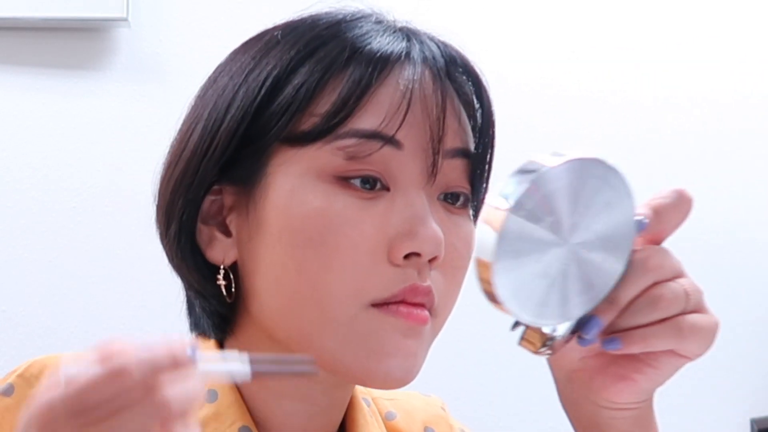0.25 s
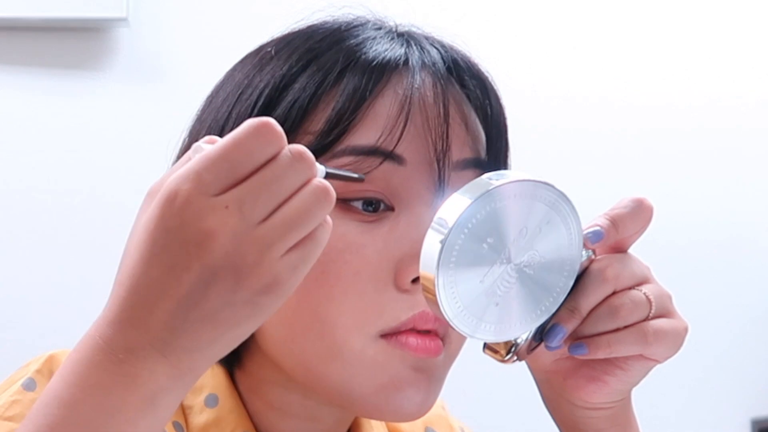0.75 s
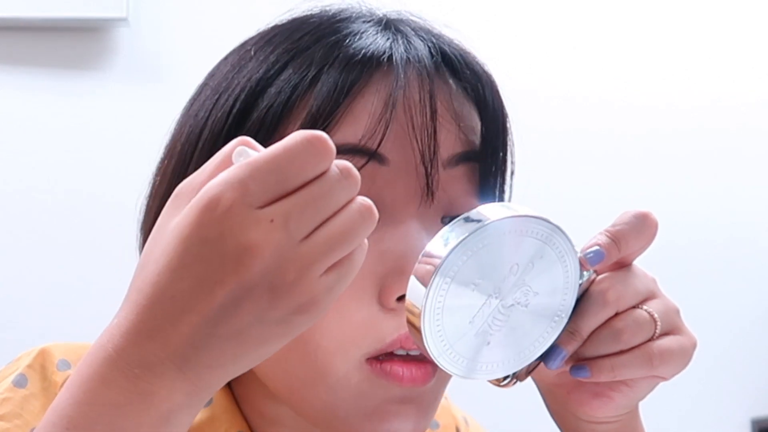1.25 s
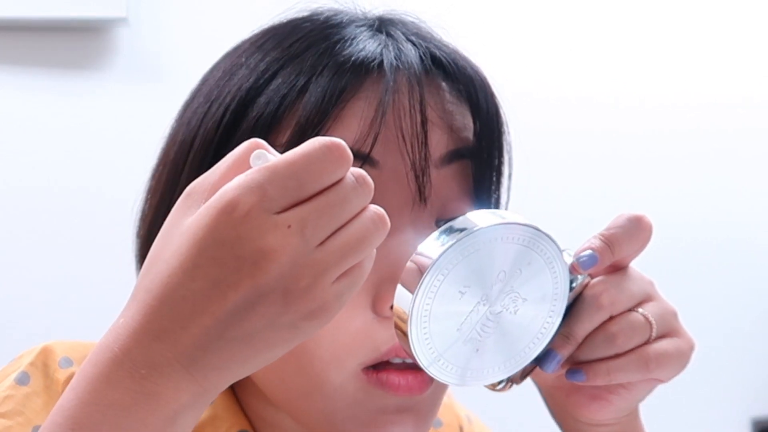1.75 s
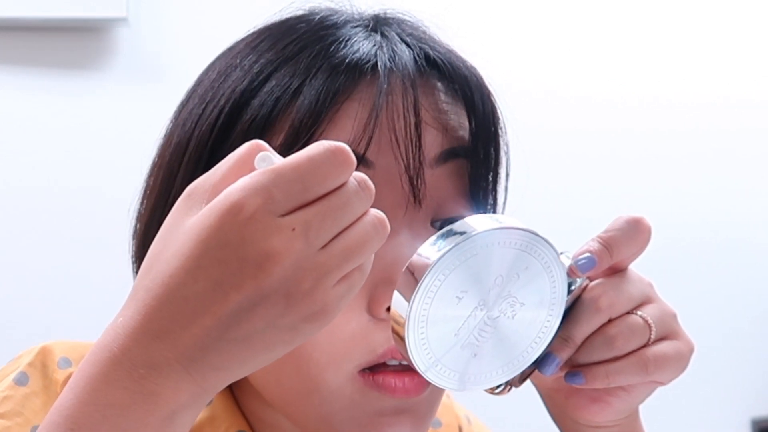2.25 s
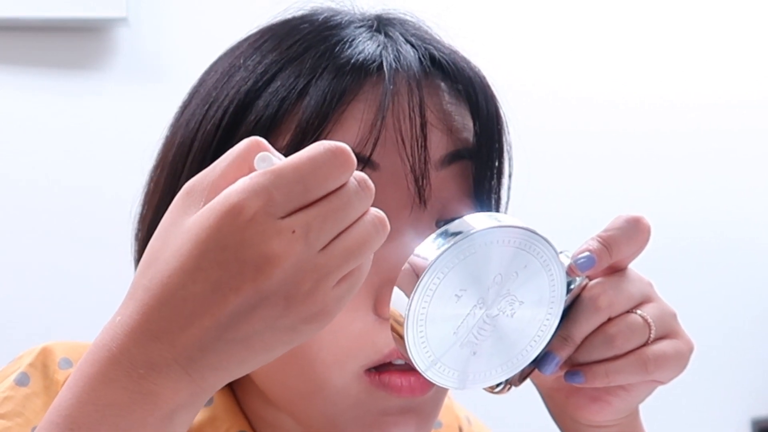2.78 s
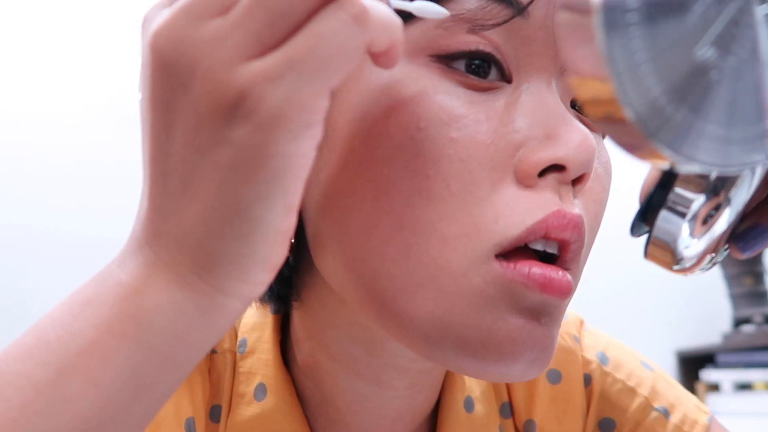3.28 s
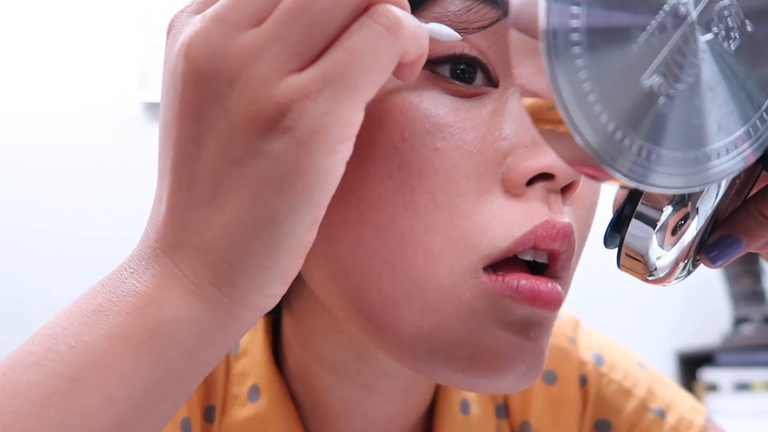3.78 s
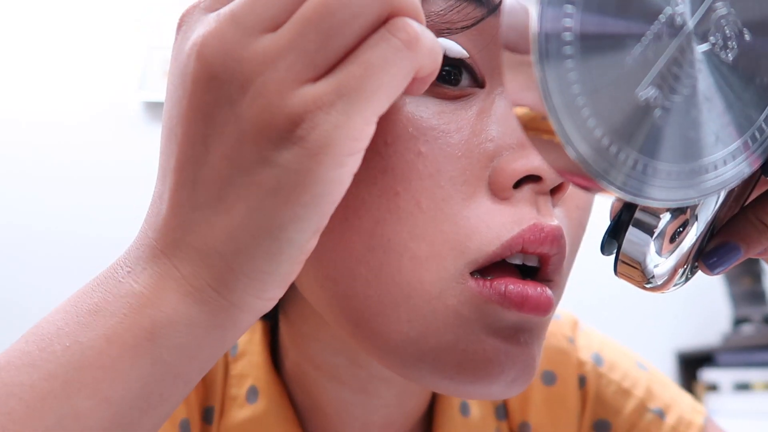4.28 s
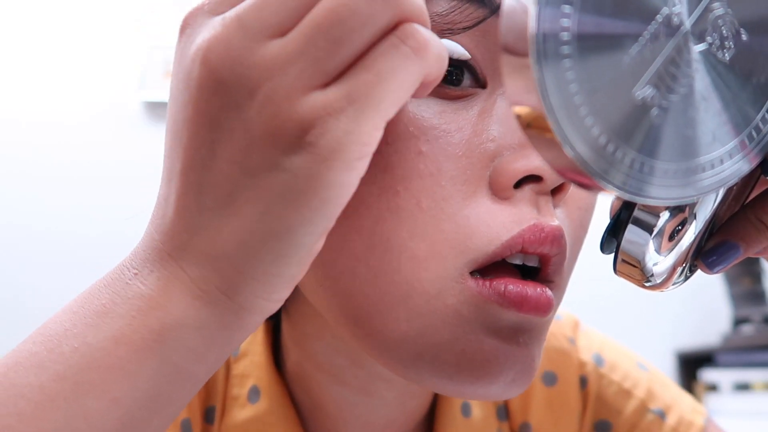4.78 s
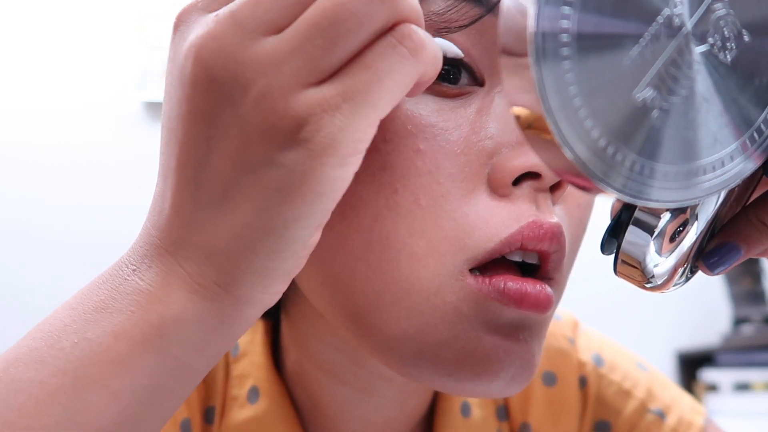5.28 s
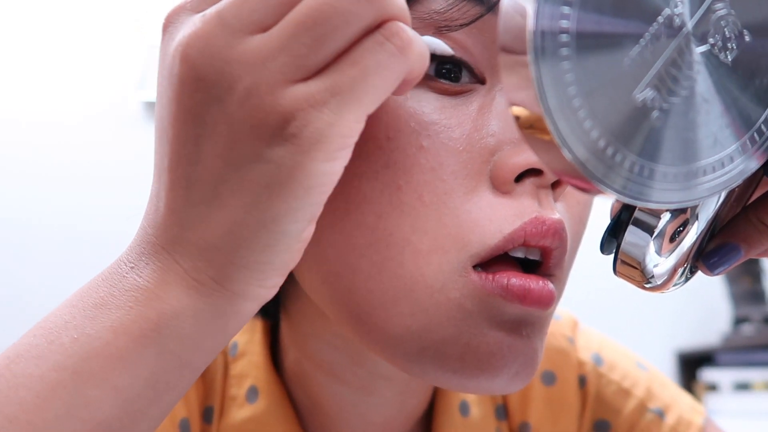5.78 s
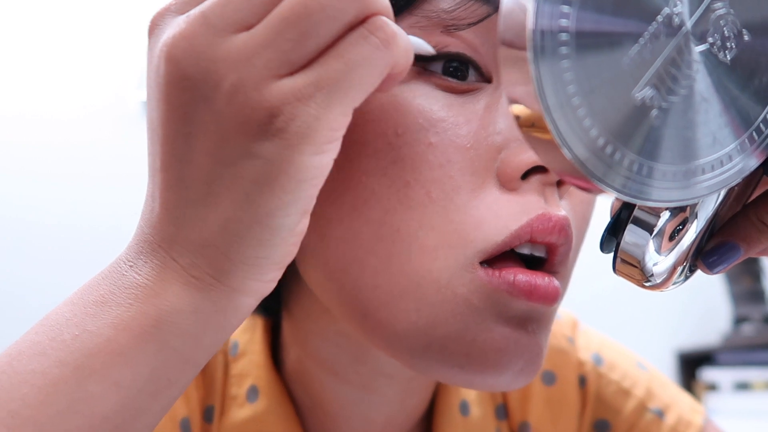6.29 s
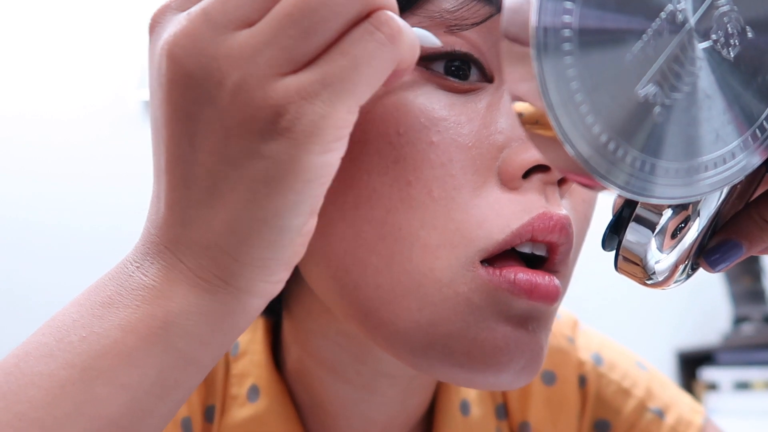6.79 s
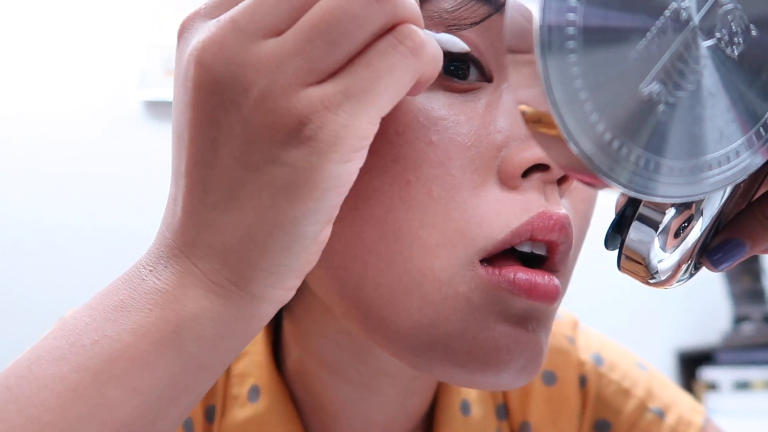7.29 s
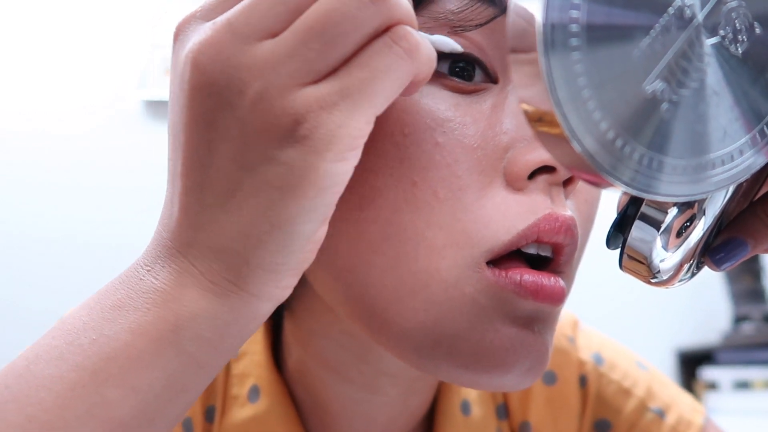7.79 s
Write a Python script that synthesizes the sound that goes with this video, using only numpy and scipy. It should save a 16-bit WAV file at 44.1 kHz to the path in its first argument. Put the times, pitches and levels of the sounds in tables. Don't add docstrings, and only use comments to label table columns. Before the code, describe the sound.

Close stereo microphone in a small, quiet, slightly live room. An air unit hums low and steadily with soft rushing. A short scrape of a small metal object opens the scene, then near-silence with tiny ticks. Just before three seconds the object is knocked down with sharp clacks and dull desk thumps. Afterwards the hum continues with faint motor ticking.

```python
import sys
import numpy as np
from scipy import signal
from scipy.fft import rfft, irfft, next_fast_len
from scipy.io import wavfile
from scipy.ndimage import uniform_filter1d, map_coordinates

SR = 44100
rng = np.random.default_rng(int(sys.argv[2]) if len(sys.argv) > 2 else 0)


def pcm_store(signal):
    levels = np.round(np.clip(np.atleast_2d(signal), -1, 1) * 32767)
    wavfile.write(sys.argv[1], SR, levels.astype(np.int16).T)


def convert_level_to_amplitude(level_db):
    exponent = np.asarray(level_db, float) / 20
    return 10 ** exponent


N = 354986
T = np.arange(N) / SR
MOVE_S = 3.25


def unit(x):
    return x / np.sqrt(np.mean(x ** 2) + 1e-20)


def along(points, hz):
    point_hz, value = np.transpose(points)
    return np.interp(np.log(hz + 1), np.log(point_hz + 1), value)


def filtered(x, response):
    size = next_fast_len(x.shape[-1] + SR // 4)
    spectrum = rfft(x, size) * response(np.fft.rfftfreq(size, 1 / SR))
    return irfft(spectrum, size)[..., :x.shape[-1]]


def resonances(modes):
    def response(f):
        total = 0
        for k, (hz, width_hz, db) in enumerate(modes):
            damping = 1j * f * width_hz
            total = total + (-1) ** k * convert_level_to_amplitude(db) * damping / (hz * hz - f * f + damping)
        return total
    return response


def noise(spectrum, patchy_db):
    z = signal.stft(rng.standard_normal(N), nperseg=512)[2]
    patches = uniform_filter1d(rng.standard_normal(z.shape), 8, 0)
    patches = uniform_filter1d(patches, 8, 1)
    x = signal.istft(z * convert_level_to_amplitude(patchy_db * unit(patches)), nperseg=512)[1][:N]
    return unit(filtered(x, lambda hz: convert_level_to_amplitude(along(spectrum, hz))))


def flutter(rate_hz):
    knots = rng.standard_normal(int(N * rate_hz / SR) + 4)
    return map_coordinates(knots, [T * rate_hz])


def placed(first, second):
    share = np.clip((T - MOVE_S) / 0.01, 0, 1)
    return np.sqrt(1 - share) * first + np.sqrt(share) * second


def add(track, start_s, sound):
    start = round(start_s * SR)
    part = track[..., start:start + sound.shape[-1]]
    part += sound[..., :part.shape[-1]]


# frequency in Hz, t60 in s.
ROOM_T60 = [(200, 0.11), (600, 0.49), (1400, 0.32), (4000, 0.21), (10000, 0.082)]
# frequency in Hz, level in dB.
PORT_DIFFERENCE = [(100, -48), (200, -42), (300, -18), (1000, -27), (3000, -14), (10000, 11)]


def echo(x):
    hz, t, z = signal.stft(rng.standard_normal((2, SR // 2)), SR, nperseg=256)
    decay = convert_level_to_amplitude(-60 * t / along(ROOM_T60, hz)[:, None])
    tail = signal.istft(z * decay, SR, nperseg=256)[1]
    tail /= np.linalg.norm(tail[0])
    delayed = np.pad(x, (200, 0))
    common, side = signal.fftconvolve(delayed[None], tail, axes=1)
    return np.array([common, filtered(side, lambda f: convert_level_to_amplitude(along(PORT_DIFFERENCE, f)))])


# frequency in Hz, level in dB at the first place, at the second.
MAINS_TONES = [(120, -41, -44), (240, -53, -59)]
# centre in seconds, change in dB.
SWELLS_DB = [(.17, -6.5), (.35, 1.5), (1.78, -17), (1.96, 2), (2.8, 5), (3.72, -8), (4.33, -14), (4.56, 5),
             (4.66, -8.5), (5.42, -6), (6.75, 3.5), (6.95, -11), (7.08, -8), (7.61, 4), (7.8, -14)]
# centre in s, spread in s, deep rise in dB, boom rise in dB.
STAND_SHUDDERS = [
    (0.01, 0.1, 9.5, 2.5),
    (2.74, 0.1, 6.5, 7),
]
# frequency in Hz, density in dB per Hz.
DEEP_SPECTRUM = [(6, -37), (16, -16), (33, 1.5), (49, -16), (63, -4), (82, -10.5), (100, -9), (128, -7),
                 (150, -43), (250, -120)]
# frequency in Hz, density in dB per Hz.
BOOM_SPECTRA = [
    [(60, -90), (110, -36), (135, 1), (145, -6.5), (172, 2), (180, -5.5), (190, 1.5), (215, -6.5),
     (240, -3), (252, -7.5), (275, -18), (310, -46), (500, -120)],
    [(60, -90), (110, -49), (135, -10.5), (145, 4), (172, -4.5), (180, 6), (190, -2), (215, -5.5),
     (240, -7), (255, -25.5), (275, -14.5), (310, -62), (500, -120)],
]
# frequency in Hz, density in dB per Hz.
RUSH_SPECTRA = [
    [(230, -40), (290, -4), (370, -7), (620, -2.5), (720, -7.5), (1050, -9), (1270, -15.5), (1550, -11),
     (2400, -18), (3000, -21.5), (4500, -29), (11000, -41.5), (14300, -47), (14700, -120)],
    [(230, -47), (290, -4.5), (450, 0), (520, -1), (580, -6.5), (630, -3.5), (1100, -12), (1600, -10.5),
     (2300, -16.5), (3000, -22), (4500, -27), (11000, -41), (12600, -43), (13000, -58), (13150, -120)],
]
# frequency in Hz, density in dB per Hz.
APART_SPECTRUM = [(40, -46), (95, -55), (130, -50), (170, -26), (215, -18), (300, -16), (460, -16),
                  (520, -20.5), (1000, -23), (3500, -30), (6000, -36), (11000, -44), (14300, -45),
                  (15000, -120)]
APART_END_HZ = [14400, 13150]


def air_unit():
    swell_s = 0.063
    swing_db = sum(db * np.exp(-((T - s) / swell_s) ** 2) for s, db in SWELLS_DB)
    deep_shake_db, boom_shake_db = 0, 0
    for s, spread_s, deep_db, boom_db in STAND_SHUDDERS:
        shake = np.exp(-((T - s) / spread_s) ** 2)
        deep_shake_db = deep_shake_db + deep_db * shake
        boom_shake_db = boom_shake_db + boom_db * shake

    tones = 0
    for hz, first_db, second_db in MAINS_TONES:
        phase = 2 * np.pi * hz * T + 0.083 * flutter(1.9)
        tones = tones + np.sqrt(2) * placed(convert_level_to_amplitude(first_db), convert_level_to_amplitude(second_db)) * np.sin(phase)
    mode = resonances([(115.63, 17.3, 0)])
    drone = convert_level_to_amplitude(-38.3) * unit(filtered(rng.standard_normal(N), lambda f: mode(f) ** 2))

    deep = placed(convert_level_to_amplitude(-37.5), convert_level_to_amplitude(-37.5)) * noise(DEEP_SPECTRUM, patchy_db=-0.4)
    deep *= convert_level_to_amplitude(0.05 * swing_db + deep_shake_db)
    first_boom, second_boom = [noise(spectrum, patchy_db=0.57) for spectrum in BOOM_SPECTRA]
    boom = placed(convert_level_to_amplitude(-40.5) * first_boom, convert_level_to_amplitude(-41.5) * second_boom)
    boom *= convert_level_to_amplitude(0.094 * swing_db + boom_shake_db)
    first_rush, second_rush = [noise(spectrum, patchy_db=1.1) for spectrum in RUSH_SPECTRA]
    rush = placed(convert_level_to_amplitude(-49) * first_rush, convert_level_to_amplitude(-49) * second_rush)

    apart = convert_level_to_amplitude(-58) * noise(APART_SPECTRUM, patchy_db=-1.5)
    apart = placed(*[filtered(apart, lambda f: f < end_hz) for end_hz in APART_END_HZ])
    return np.array([convert_level_to_amplitude(swing_db) * (tones + drone) + deep + boom + rush, apart])


FRAME_HZ = 29.97
# offset in s, level in dB idling, hunting, tracking.
MOTOR_PROGRAM = [(0, -70, -64, -55), (.008, -63, -59, -64), (.048, -61, -56, -53), (.067, -70, -61, -70),
                 (.076, -60, -57, -57), (.115, -61, -56, -57), (.133, -70, -57, -62), (.163, -70, -59, -70),
                 (.182, -66, -56, -60), (.201, -70, -64, -60), (.208, -70, -57, -60), (.248, -56, -57, -61)]
# from in seconds, to in seconds.
FOCUS_SPANS = [
    (.74, 2.2),
    (3.53, 4.45),
    (4.45, 8.05),
]


def motor_steps():
    offset_s, *state_db = np.transpose(MOTOR_PROGRAM)
    round_starts_s = np.arange(0.2281, N / SR, 8 / FRAME_HZ)
    times_s = round_starts_s[:, None] + offset_s
    scatter_db = 2 * rng.standard_normal(times_s.shape)
    steps = []
    for (begin_s, end_s), level_db in zip(FOCUS_SPANS, state_db):
        for s, db in zip(times_s.ravel(), (level_db + scatter_db).ravel()):
            if begin_s <= s < end_s:
                steps.append((s, db))
    return steps


# frequency in Hz, difference level in dB, common level in dB.
BARREL_MODES = [(3300, -9, -30), (3550, -20, -9), (4030, 0, -8), (4620, -11, -11), (5330, -14, -13)]
# frequency in Hz, dB at the first place, dB at the second, pulse depth 0-1.
DRIVE_WHINE = [(5526, -85, -92, 0.05), (11779, -94, -94, .3), (13006, -96, -81, .8)]


def lens():
    out, t = np.zeros((2, N)), np.arange(SR // 50) / SR
    shape = convert_level_to_amplitude(-60 * t / 0.014) * (1 - np.exp(-t / 0.0008)) ** 2
    for s, db in motor_steps():
        ring = 0
        for hz, side_db, common_db in BARREL_MODES:
            gain = convert_level_to_amplitude(np.array([[common_db], [side_db]]) + rng.normal(0, 1.5))
            ring = ring + gain * np.sin(2 * np.pi * hz * t + [[1.9], [0]])
        add(out, s - 0.001, convert_level_to_amplitude(db + 9) * ring * shape)
    for hz, first_db, second_db, depth in DRIVE_WHINE:
        pulse = 1 + depth * np.tanh(3 * np.sin(2 * np.pi * FRAME_HZ * T + 0.3))
        tone = placed(convert_level_to_amplitude(first_db), convert_level_to_amplitude(second_db)) * pulse * np.sin(2 * np.pi * hz * T)
        out += convert_level_to_amplitude([[-22], [0]]) * tone
    return out


# start in s, peak in dB,
# centre in Hz, width in Hz, decay in s.
NOISE_PUFFS = [(0.0, -21, 1700, 2200, .42), (2.752, -27, 2400, 4500, .2),
               (2.751, -44.5, 8900, 6000, 0.11), (2.685, -43, 4560, 500, .14),
               (2.765, -57, 6700, 400, .16), (2.755, -37, 3630, 400, 0.1), (2.665, -30, 650, 370, 0.13),
               (2.753, -24, 900, 1000, .22), (0.74, -54, 4700, 1900, 0.018),
               (1.17, -55, 4900, 2000, 0.22), (1.15, -54, 3200, 900, .6), (1.344, -46.5, 3900, 770, 0.14),
               (1.348, -57, 5000, 500, 0.18), (1.543, -51, 4700, 2000, 0.017),
               (2.7503, -18, 2150, 1400, 0.034), (2.902, -33, 1400, 1800, .36),
               (2.981, -47, 4200, 5500, .25), (3.222, -83, 13500, 2500, .03),
               (4.47, -60, 6000, 4900, 0.18), (7.248, -85, 12700, 3000, .006),
               (7.341, -77, 12200, 3000, 0.0055), (7.358, -85, 11500, 4000, .006),
               (7.968, -48, 6000, 2500, 0.4), (7.973, -68, 13000, 3000, .08)]
# frequency in Hz, level in dB.
PUFF_DIFFERENCE = [(1500, -13), (3900, -9.5), (5100, -4), (6200, 4), (8500, 3), (12500, 17)]


def puffs():
    out, t = np.zeros((2, N)), np.arange(SR // 2) / SR
    for s, db, hz, width_hz, decay_s in NOISE_PUFFS:
        envelope = convert_level_to_amplitude(-60 * t / decay_s) * (1 - np.exp(-t / (0.03 * decay_s)))
        puff = rng.standard_normal((2, len(t))) * envelope
        mode = resonances([(hz, width_hz, 0)])
        puff = filtered(puff, lambda f: mode(f) ** 2 / (1 + (f / (2.3 * hz)) ** 4))
        side_db = db + along(PUFF_DIFFERENCE, hz)
        add(out, s, convert_level_to_amplitude([[db], [side_db]]) * puff / abs(puff).max())
    return out


# peak time in seconds, peak in dB.
DESK_THUMPS = [(2.682, -21), (2.719, -21), (2.77, -18.5), (2.779, -25.5), (2.808, -25), (2.925, -29),
               (3.0, -39)]
# frequency in Hz, width in Hz, level in dB.
DESK_MODES = [(83, 30, -8.5), (128, 41, -15), (156.2, 26, 9), (196, 18, 6), (331.4, 9.5, 7)]


def desk():
    out, t = np.zeros((2, N)), np.arange(SR // 4) / SR
    push = filtered(np.exp(-((t - 0.005) / 0.0014) ** 2), resonances(DESK_MODES))
    push /= abs(push).max()
    for s, db in DESK_THUMPS:
        add(out[0], s - 0.005, convert_level_to_amplitude(db) * push)
        add(out, s - 0.005, convert_level_to_amplitude(db - 12) * echo(push))
    return out


# start in s, peak in dB, scrape length in s, tilt in dB per octave, room in dB.
CASE_KNOCKS = [
    (0.001, -24, 0.075, -5, 0),
    (2.662, -26, 0.04, -.5, -5),
    (2.69, -42.5, 0.022, 4, 0),
    (2.7492, -22, 0.0093, 1.5, -6),
    (2.756, -25, 0.01, -7, -8),
    (2.79, -37, .02, 0, -2),
    (2.903, -41, 0.063, -5, -7),
]
# frequency in Hz, width in Hz, level in dB.
CASE_MODES = [(460, 87, -7), (743, 156, 4.5), (1110, 205, 8), (1856, 254, 4.5), (2050, 460, 3),
              (2470, 590, 3.5), (3140, 390, 1), (3470, 410, -2.5), (5000, 1460, -11.5), (5400, 670, -26),
              (6270, 610, -26), (8550, 4000, -49), (10700, 2000, -51)]


def case():
    out, t = np.zeros((2, N)), np.arange(SR // 4) / SR
    shell = resonances(CASE_MODES)
    for s, db, length_s, tilt_db, room_db in CASE_KNOCKS:
        envelope = convert_level_to_amplitude(-60 * t / (3 * length_s)) * (1 - np.exp(-t / 0.00043))
        grit = rng.standard_normal(len(t)) * envelope

        def response(f):
            tilt = convert_level_to_amplitude(tilt_db * np.log2((f + 100) / 2000))
            return shell(f) * tilt / (1 + (f / 12500) ** 8)

        body = filtered(grit, response)
        body *= convert_level_to_amplitude(db) / abs(body).max()
        left = filtered(body, lambda f: convert_level_to_amplitude(along(PORT_DIFFERENCE, f) - 3))
        add(out, s, np.array([body, left]))
        add(out, s, convert_level_to_amplitude(room_db) * echo(body))
    return out


def scene():
    common, side = air_unit() + lens() + puffs() + desk() + case()
    return np.array([common + side, common - side])


def band_limit(x):
    return signal.sosfilt(signal.butter(12, 15000, fs=SR, output="sos"), x)


def record(dry):
    return band_limit(dry)


dry = scene()
out = record(dry)
pcm_store(out)
```